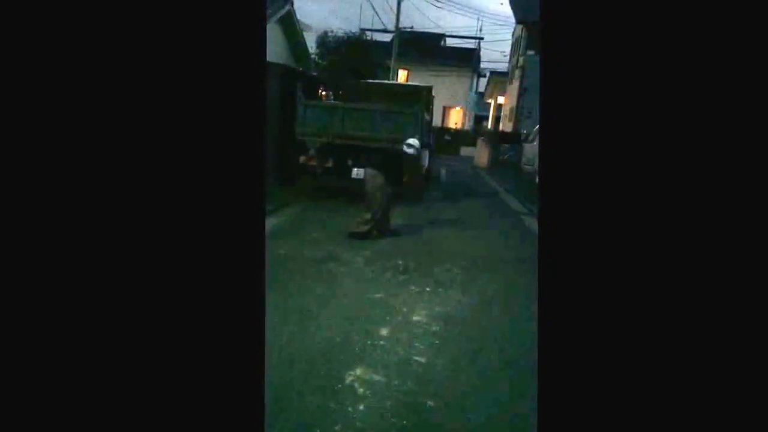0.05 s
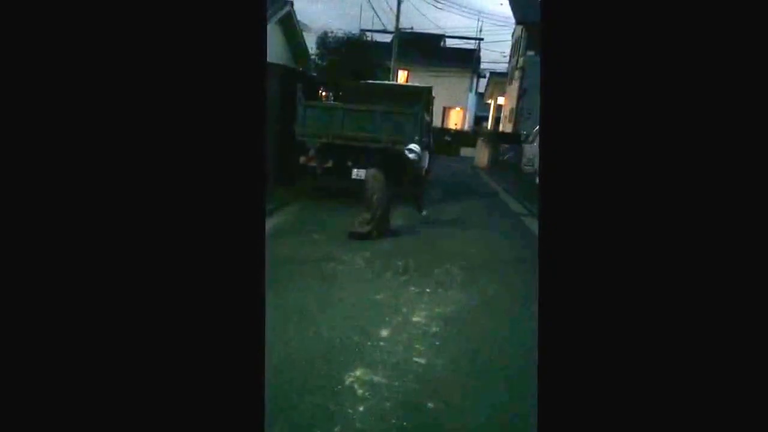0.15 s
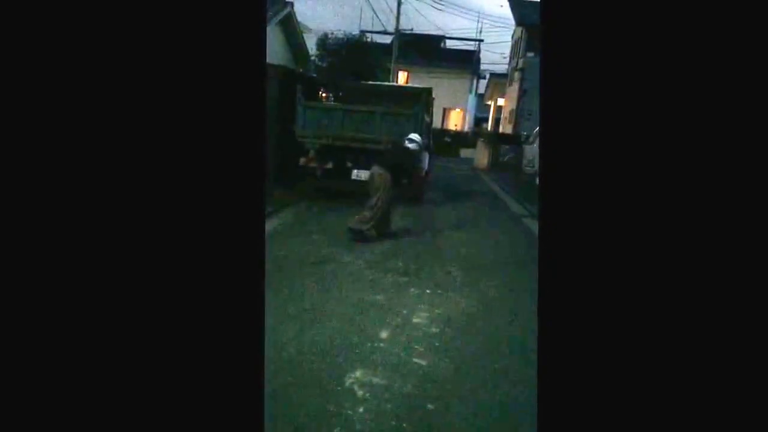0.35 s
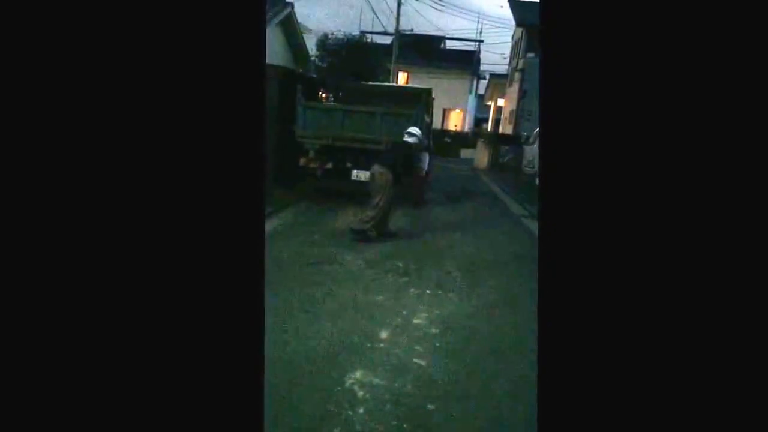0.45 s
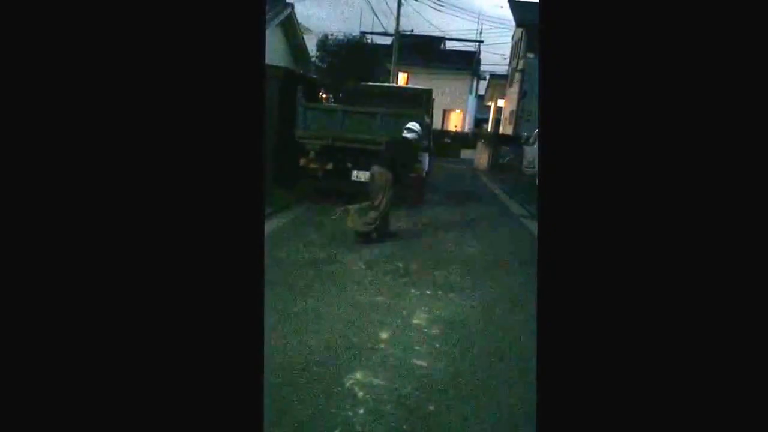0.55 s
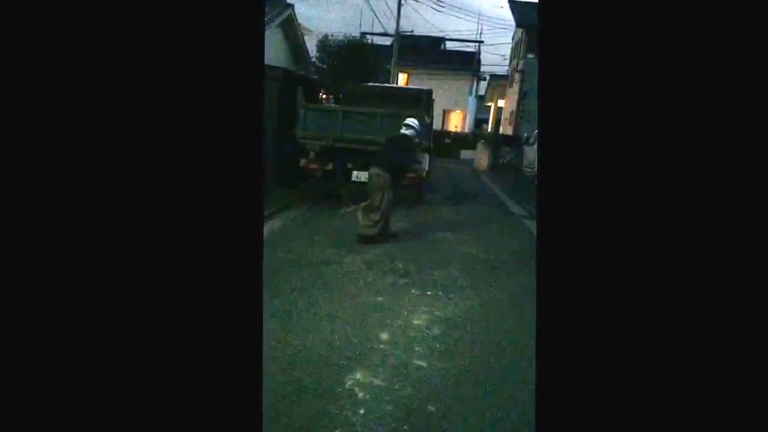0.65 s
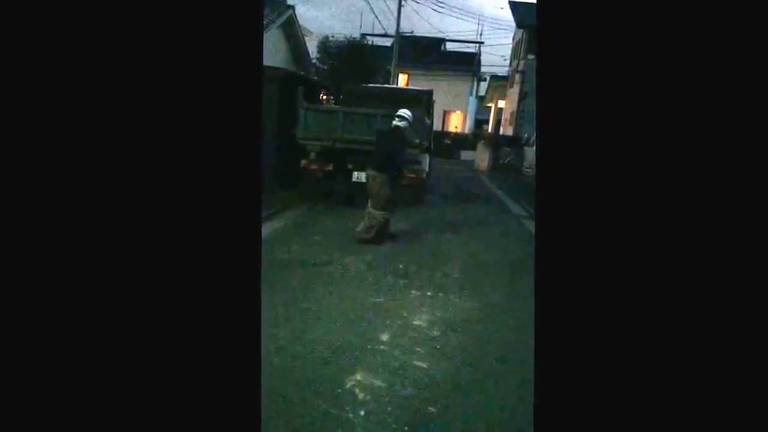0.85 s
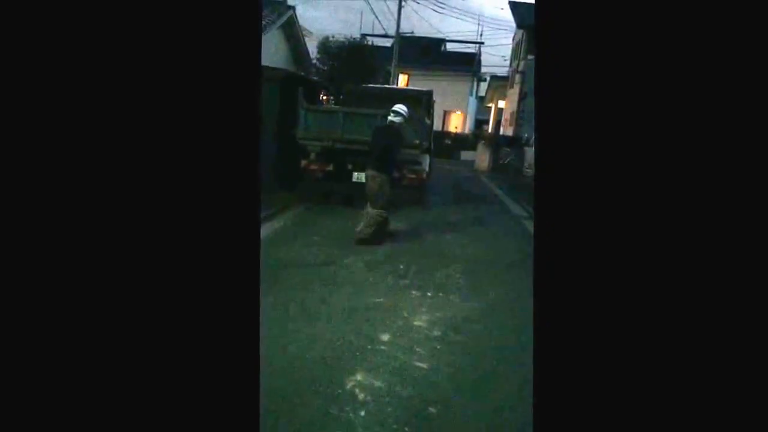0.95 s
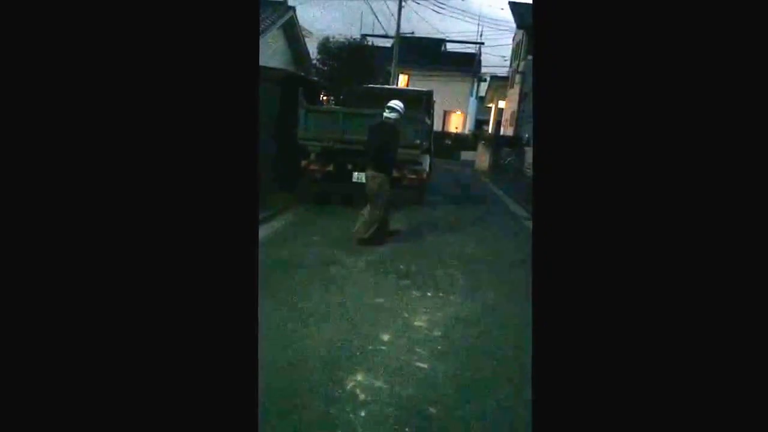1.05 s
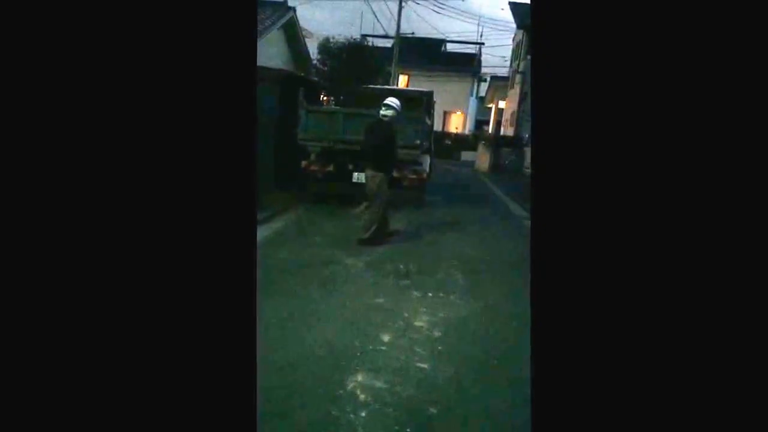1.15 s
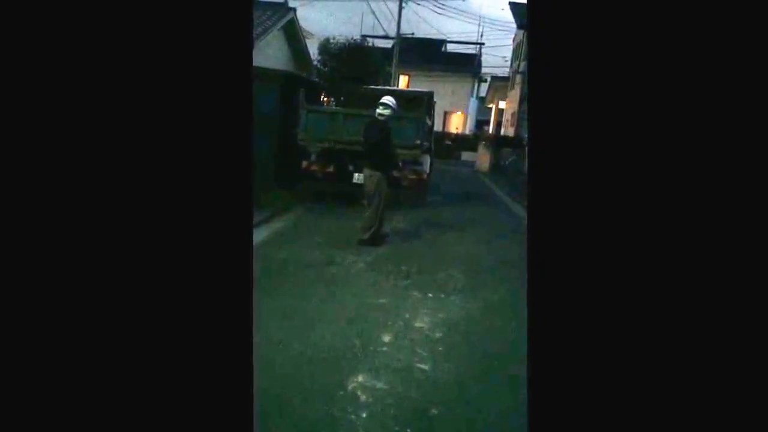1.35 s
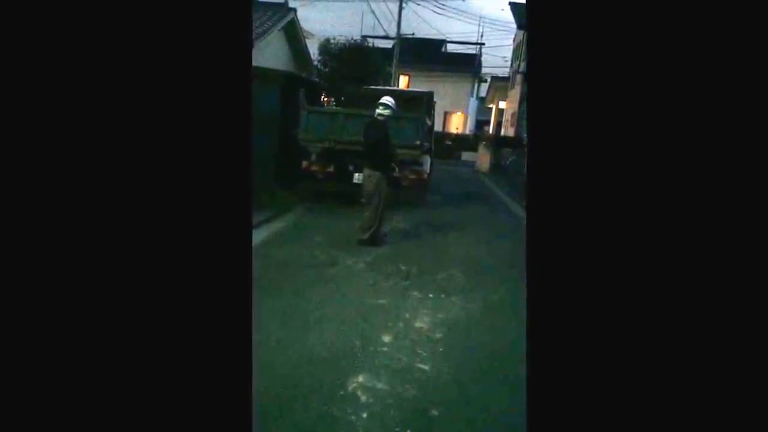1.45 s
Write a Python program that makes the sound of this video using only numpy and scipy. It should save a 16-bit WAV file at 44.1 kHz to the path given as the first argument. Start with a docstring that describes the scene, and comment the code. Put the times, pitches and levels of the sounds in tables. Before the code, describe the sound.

A rope cracks once on asphalt, echoing down a quiet street, then faint footsteps.

```python
"""A narrow street at dusk, with a low, uneven rumble and a faint hiss.
A heavy rope swishes through the air; at about 0.24 s its tip snaps and its strands slap the asphalt.
The house fronts throw the crack back, and the street rings briefly.
From 0.56 s the rope's end drops again, with light ticks and gritty scrapes.
A boot knocks on the road at 0.73 s, and three softer steps follow near the end."""
import sys
import numpy as np
from scipy import signal
from scipy.fft import rfft, irfft
from scipy.io import wavfile
from scipy.ndimage import uniform_filter1d

SR = 44100
rng = np.random.default_rng(int(sys.argv[2]) if len(sys.argv) > 2 else 0)


def store_pcm(level_fs):
    """Save levels as 16-bit WAV."""
    pcm = np.round(np.clip(level_fs, -1, 1) * 32767).astype(np.int16)
    wavfile.write(sys.argv[1], SR, np.atleast_2d(pcm).T)


N = 66150
T = np.arange(N) / SR
HZ = np.fft.rfftfreq(N, 1 / SR)


def amp(db):
    """Turns decibels into a volume factor."""
    return 10 ** (np.asarray(db) / 20)


def unit(x):
    """Scales to an average power of one."""
    return x / np.sqrt(np.mean(x ** 2) + 1e-20)


def read(points, hz):
    """Looks up a table between its rows, on a log-frequency scale."""
    f, value = np.transpose(points)
    return np.interp(np.log(hz + 1), np.log(f + 1), value)


def causal(x, gain):
    """Filters with one gain per frequency, ringing only after the sound."""
    forward_only = 1 + np.sign(N / 2 - np.arange(N)) - (np.arange(N) == 0)
    cepstrum = irfft(np.log(gain + 1e-6), N) * forward_only
    ring = irfft(np.exp(rfft(cepstrum)), N)[:N // 8]
    return signal.fftconvolve(x, ring)[:N]


def colour(x, tone, tilt=0):
    """Gives a sound a tone colour; a positive tilt [dB/octave] brightens it."""
    octaves = np.log2(np.maximum(HZ, 500) / 1000)
    return causal(x, unit(amp(read(tone, HZ) + tilt * octaves)))


def noise(tone, tilt=0):
    """Steady noise with the given tone colour."""
    gain = amp(read(tone, HZ) + tilt * np.log2(HZ / 1000 + .1))
    return unit(irfft(rfft(rng.standard_normal(N)) * gain, N))


def envelope(start, rise, hold, fade):
    """Rises, holds, then dies away. Times are in seconds; a fade time is a fall of 60 dB."""
    age = T - start
    attack = np.clip(age / max(rise, 1 / SR), 0, 1)
    return attack * 1000 ** (-np.maximum(age - rise - hold, 0) / max(fade, 1e-4))


def wander(rate_hz):
    """A smooth random wobble, mostly slower than rate_hz."""
    smoothing = np.exp(-(HZ / rate_hz) ** 2) * (HZ > 0)
    return unit(irfft(rfft(rng.standard_normal(N)) * smoothing, N))


def burst(start, hold, fade):
    """A dense run of tiny impacts that holds and dies away."""
    x = rng.standard_normal(N // 16)
    for _ in range(10):  # even out the frequencies
        z = signal.stft(x, nperseg=192)[2]
        x = signal.istft(z / (abs(z) + 1e-20), nperseg=192)[1]
    return np.resize(unit(x), N) * envelope(start, 0, hold, fade)


# Tone of the rumble: (frequency [Hz], level [dB])
RUMBLE_TONE = [(20, -30), (32, -15), (48, -1), (70, 0.5), (100, -3), (140, -11), (230, -15), (330, -16),
               (500, -33.5), (1500, -58.5)]
# How it comes and goes: (time [s], level [dB])
RUMBLE_SWELLS = [(0.0, -57.5), (0.15, -57.5), (0.17, -60), (0.274, -52), (0.404, -56.5), (0.426, -50.5),
                 (0.526, -67.5), (0.576, -56.5), (0.672, -58.5), (0.692, -54.5), (0.844, -64.5),
                 (0.964, -54), (0.99, -60.5), (1.16, -56), (1.186, -68.5), (1.294, -61), (1.32, -60),
                 (1.5, -60)]
# Tone of the distant hiss: (frequency [Hz], level [dB])
HISS_TONE = [(100, -5.5), (400, -1.5), (800, -2), (1400, -3.5), (2500, -8.5), (5000, -15.5), (10000, -20),
             (15000, -24), (16000, -36.5)]
# How loud the hiss is: (time [s], level [dB])
HISS_LEVEL = [(0, -68), (.8, -68.5), (1.2, -69), (1.5, -72)]
def background():
    """An uneven low rumble under a faint hiss."""
    swells = amp(np.interp(T, *np.transpose(RUMBLE_SWELLS)) - .5)
    rumble = noise(RUMBLE_TONE) * np.hypot(amp(-65), swells)  # never quite silent
    hiss = noise(HISS_TONE) * amp(np.interp(T, *np.transpose(HISS_LEVEL)))
    return rumble + hiss


# Tone of the rope cutting the air: (frequency [Hz], level [dB])
SWISH_TONE = [(100, -14), (300, -2), (800, 0), (2000, -10), (5000, -17), (14000, -29.5)]
def swish():
    """Air noise grows as the rope speeds up and stops when it lands."""
    top_db, rise_db_per_s = -48.5, 269.5
    time_left = CRACK_STAGES[0][0] - T
    return noise(SWISH_TONE) * amp(top_db - rise_db_per_s * abs(time_left)) * (time_left > 0)


# Quick stages of the crack: (time [s], relative level [dB], hold [s], fade [s], tilt [dB/octave])
CRACK_STAGES = [(.2350, -14.5, .0013, 0.0084, 3), (.2370, -6, .0015, .007, -.5),
                (0.24, -19, .0016, .02, -1.05)]
# Tone of the slap: (frequency [Hz], level [dB])
SLAP_TONE = [(59, -51.5), (100, -22.5), (249, -9.5), (381, -9), (524, -22.5), (784, -3.5), (1060, -8),
             (1150, -8.5), (1310, -5.5), (1610, -6), (1720, -7.5), (2320, 0), (2860, -11), (3120, 0),
             (4110, -8), (4570, -2.5), (5530, -10.5), (6150, 0), (7610, -9.5), (8280, -9.5), (9820, -10.5),
             (10500, -16.5), (11900, -14), (14400, -16), (16000, -38.5)]
def crack():
    """The tip snaps, then the strands slap down within a few milliseconds."""
    hits = sum(colour(amp(db) * burst(start, hold, fade), SLAP_TONE, tilt)
               for start, db, hold, fade, tilt in CRACK_STAGES)
    # Steer the sum back to the slap's tone.
    target = unit(amp(read(SLAP_TONE, HZ)))
    excess_power = uniform_filter1d(abs(rfft(hits) / target) ** 2, size=900)
    slap = causal(hits, 1 / np.sqrt(abs(excess_power) + 1e-12))
    energy = np.sum(slap ** 2) / SR
    return amp(-33) * slap / np.sqrt(energy)


# Tone of the ringing street: (frequency [Hz], level [dB])
STREET_TONE = [(80, -23.5), (190, -10), (270, -13.5), (480, -13.5), (700, -5), (1200, 0.5), (2600, 0.5),
               (4200, -3), (6500, -6.5), (10000, -14.5), (14500, -21.5), (16000, -43)]
# How long it rings: (frequency [Hz], fade [s])
STREET_FADE = [(200, 0.68), (800, .6), (2200, .62), (4200, .56), (6000, .45), (9000, .40), (14000, 0.29)]
# Echoes off walls and a parked truck: (delay [s], level [dB], fade [s], tilt [dB/octave])
STREET_ECHOES = [(.006, -22, 0.095, -1.1), (0.0147, -26, 0.086, 0.68), (0.025, -29, 0.12, -0.5),
                 (0.059, -34.5, 0.034, -1), (.109, -37, 0.033, -3), (0.193, -50, 0.41, -4.5)]
def street():
    """The crack bounces back as blurred echoes and a wash of sound whose treble dies first."""
    start = CRACK_STAGES[1][0]
    wash_delay_s, wash_rise_s, echo_rise_s = .003, .004, .0028
    hz, t, bands = signal.stft(noise(STREET_TONE), SR, nperseg=256)
    decay = 1000 ** (-np.maximum(t - start, 0) / read(STREET_FADE, hz)[:, None])
    wash = signal.istft(bands * decay, SR, nperseg=256)[1][:N]
    wash *= amp(-29.5) * np.clip((T - start - wash_delay_s) / wash_rise_s, 0, 1)
    echoes = sum(noise(STREET_TONE, tilt) * amp(db)
                 * envelope(start + delay - echo_rise_s, echo_rise_s, 0, fade)
                 for delay, db, fade, tilt in STREET_ECHOES)
    return wash + echoes


# Ticks of the rope's end and of grit: (time [s], level [dB], tilt [dB/octave])
LIGHT_TICKS = [(0.5606, -24, -0.5), (0.5615, -34.5, 3), (.6110, -36, 1), (0.6156, -36, -1),
               (0.729, -48.5, -4), (.930, -52, -3.5)]
# Tone of the ticks and scrapes: (frequency [Hz], level [dB])
GRIT_TONE = [(200, -23), (1200, -8), (3000, 0), (7000, 1.5), (10000, -3.5), (14500, -5), (16000, -23)]
# Rope and soles scraping: (time [s], level [dB], rise [s], fade [s])
GRIT_SCRAPES = [(.562, -50, 0.0021, 0.16), (0.607, -63, 0.014, 0.062), (1.15, -74.5, 0.017, 0.14)]
def ticks_and_scrapes():
    """The rope's end ticks down with short rattles; rope and soles drag over grit."""
    ticks = np.zeros(N)
    for start, db, tilt in LIGHT_TICKS:
        click = np.sinc((T - start) * SR)
        rattle = amp(-20) * burst(start, hold=0, fade=.012)
        ticks += colour(amp(db) * (click + rattle), GRIT_TONE, tilt)
    grit = unit(rng.standard_normal(N) * amp(.5 * wander(rate_hz=1000)))
    drags = sum(amp(db) * envelope(start, rise, 0, fade) for start, db, rise, fade in GRIT_SCRAPES)
    return ticks + colour(grit * drags, GRIT_TONE)


# Boots on the road: (time [s], level [dB], pitch [Hz], fade [s])
BOOT_STEPS = [(.728, -41, 295, 0.041), (1.285, -48.5, 240, 0.056), (1.385, -51.5, 216, 0.084),
              (1.424, -50.5, 220, .06)]
# Tone of a heel's scuff: (frequency [Hz], level [dB])
HEEL_TONE = [(100, -2), (300, 0), (700, -10), (1200, -12), (3200, -21), (5000, -38), (12000, -60)]
def boots():
    """Each step is a dull two-tone knock, a scuff and a short tail; harder steps are brighter."""
    rise_s = .0014
    steps = np.zeros(N)
    for start, db, hz, fade in BOOT_STEPS:
        force = amp(db - BOOT_STEPS[0][1]) ** 2  # compared with the first step
        phase = 2 * np.pi * hz * (T - start)
        overtone = force * amp(-7) * np.sin(2.03 * phase)
        knock = (np.sin(phase) + overtone) * envelope(start, rise_s, 0, fade)
        scuff = amp(-18) * envelope(start, 0, 0, fade=.016)
        tail = amp(-21.5) * envelope(start, rise_s, 0, fade=.35)
        steps += amp(db) * (knock + force * noise(HEEL_TONE) * (scuff + tail))
    return steps


def scene():
    """Adds all the sounds into one channel."""
    return (crack() + swish() + street() + ticks_and_scrapes() + boots() + background())[None]


def record(dry):
    """Gently squashes the loudest peaks, then cuts the treble above 15.5 kHz."""
    treble_cut = signal.firwin(255, 15500, window=("kaiser", 9), fs=SR)
    return signal.oaconvolve(np.tanh(dry), treble_cut[None], "same")


dry = scene()
out = record(dry)
store_pcm(out)
```